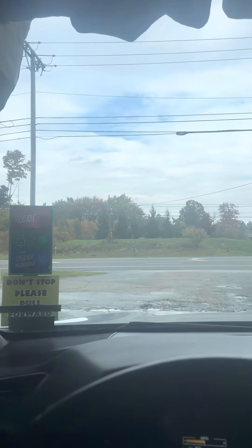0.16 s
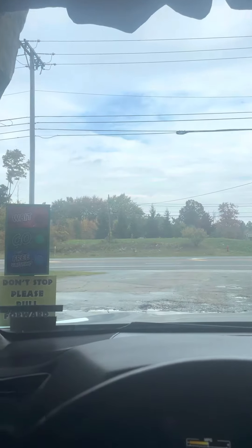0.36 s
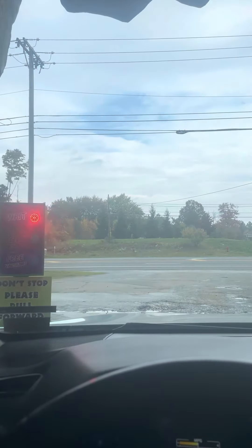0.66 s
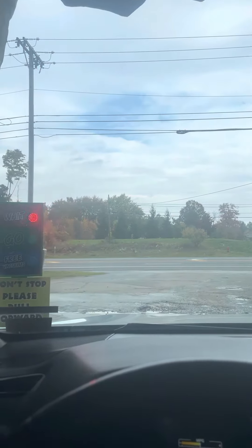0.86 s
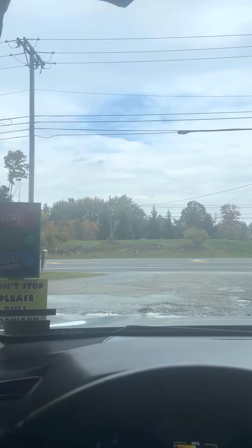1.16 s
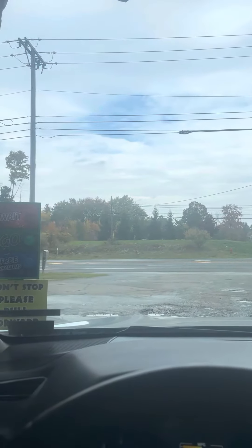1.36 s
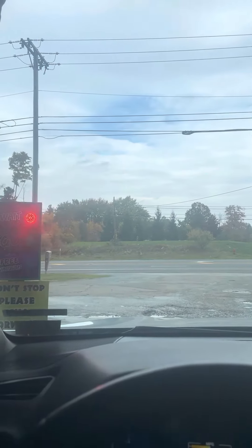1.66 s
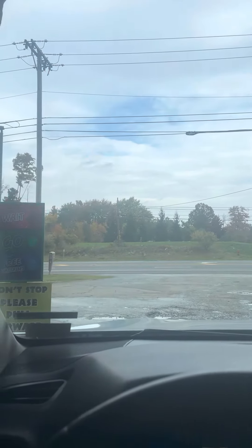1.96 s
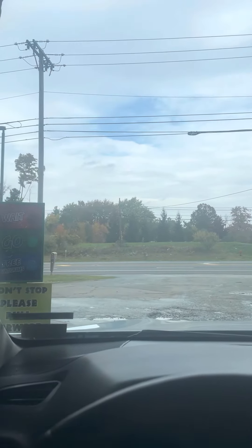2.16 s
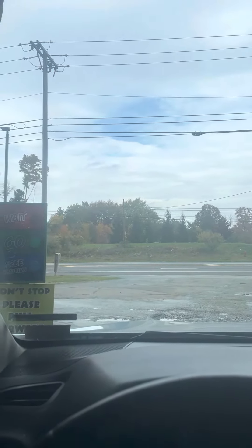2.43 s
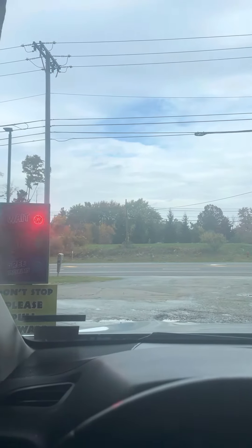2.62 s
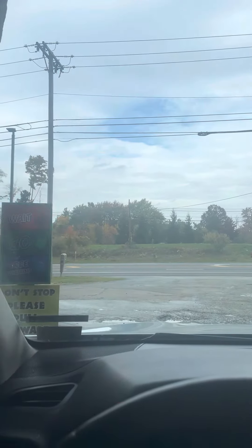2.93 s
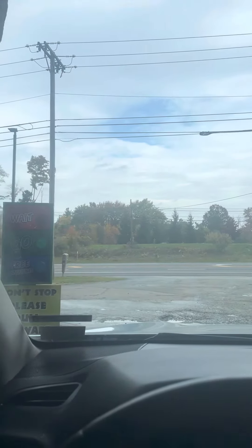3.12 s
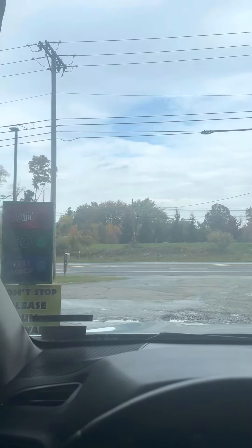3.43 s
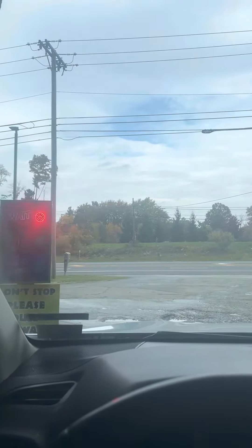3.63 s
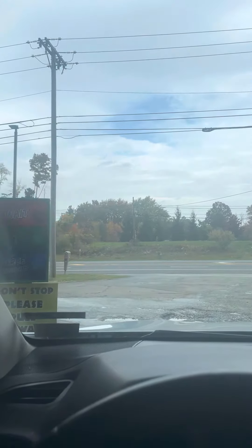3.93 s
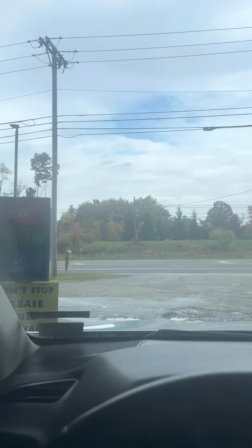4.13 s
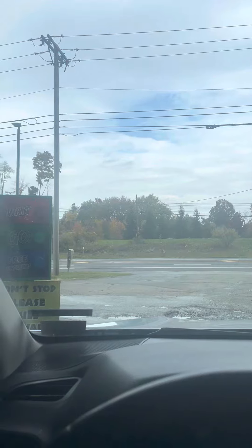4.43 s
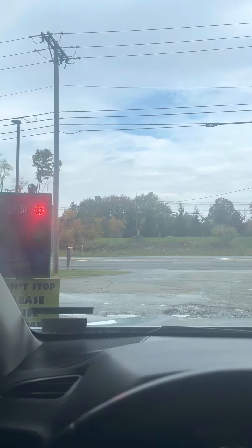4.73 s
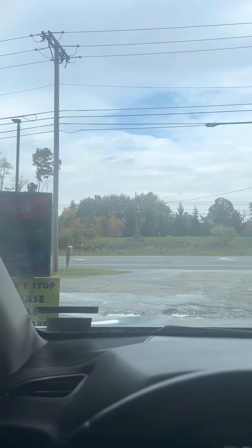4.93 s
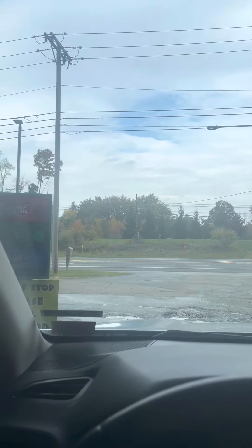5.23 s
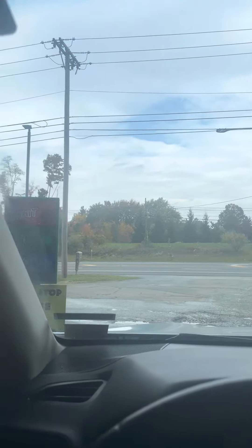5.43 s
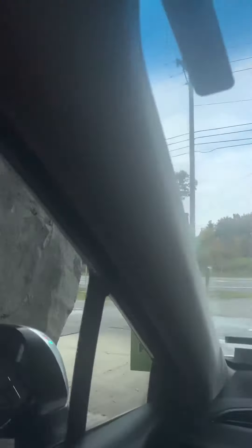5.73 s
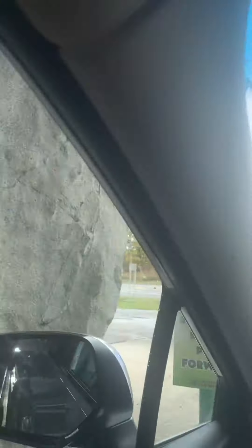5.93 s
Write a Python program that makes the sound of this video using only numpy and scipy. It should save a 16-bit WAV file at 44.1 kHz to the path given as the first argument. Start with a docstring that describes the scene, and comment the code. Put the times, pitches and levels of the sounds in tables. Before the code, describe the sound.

Large blowers dry a car at the end of a wash tunnel, heard inside with the windows shut. A deep panel boom and a low fan hum dominate, with a muffled duct roar above and a thin, much quieter hiss through glass and seals. It is already running at the start and continues evenly, with only slight surges, to the end. A hand-held stereo microphone picks it up close within the small cabin.

```python
"""Large blowers dry a car at the end of a wash tunnel, heard inside it with the windows closed: a steady rush of air.
The unbalanced fan shafts hum as one slowly swelling sine; the jets shake the panels into a low boom of noise.
Duct roar and a thin hiss through glass and seals are noise coloured by the cabin, with short reflections.
A hand-held two-port microphone hears these; its recorder adds two very faint, narrow flickering
noise bands near 12 kHz."""
import sys
import numpy as np
from scipy import signal
from scipy.fft import rfft, irfft, next_fast_len
from scipy.io import wavfile

SR = 44100
rng = np.random.default_rng(int(sys.argv[2]) if len(sys.argv) > 2 else 0)


def put_to_file(sound):
    """Save the sound as 16-bit audio at rate SR, in the file named by the first command-line argument."""
    columns = np.atleast_2d(sound).T  # one column per channel
    safe = np.clip(columns, -1, 1)
    whole_steps = np.round(safe * 32767)
    wavfile.write(sys.argv[1], SR, whole_steps.astype(np.int16))


N = 267951   # samples


def from_db(db):
    """Decibels to gain."""
    return 10 ** (np.asarray(db) / 20)


def rms_one(x):
    """Scale to unit rms."""
    return x / np.sqrt(np.mean(x ** 2) + 1e-20)


def in_time(rows):
    """Table columns as straight-line curves over time, one value a sample."""
    s, *columns = np.transpose(rows)
    return [np.interp(np.arange(N) / SR, s, column) for column in columns]


def at_hz(points, hz, outside=None):
    """Read the columns of (hz, value, ..) rows on a log-frequency axis."""
    where_hz, *columns = np.transpose(points)
    return [np.interp(np.log(hz), np.log(where_hz), column, left=outside, right=outside)
            for column in columns]


def drift(rate_hz):
    """Slow random wandering of rms 1: noise through two equal one-pole low-passes."""
    stride = 40   # samples between the points of the slow noise
    pole = np.exp(-2 * np.pi * rate_hz * stride / SR)
    noise = rng.standard_normal(N // stride + 2002)
    slow = signal.lfilter([1], [1, -2 * pole, pole * pole], noise)
    slow = rms_one(slow[2000:])   # the filter has settled by here
    return np.interp(np.arange(N) / stride, np.arange(len(slow)), slow)


def turbulence(spectrum, gust_db, patch_db, patch_rate_hz, bright_db=0):
    """Air noise of rms 1, coloured by its path and the cabin resonances, at both microphone ports."""
    # cabin and glass resonances: centre_hz, width_hz, lift_db
    resonances = [(47, 4.3, -0.5), (72, 7, 0), (108, 16, 1.5), (124.5, 4, -0.5), (132, 15, 2.5),
                  (146.5, 10, 1), (174, 6.5, 2), (241, 27, 2), (295, 19, 4), (340, 14, 3), (380, 35, 5.5),
                  (415, 17, -1.5), (433.5, 5, 6.5), (453, 14, 5), (487.3, 35, 4.5), (515, 21, -2.5),
                  (554, 22, 1), (600, 16, 3.5), (640, 15, 3.5), (790, 43, 1), (875, 15, -1), (960, 51, 1),
                  (1070, 79, 3), (1177, 66, 2.5), (1870, 140, 2.5), (2220, 120, 2), (2457, 220, 4.5),
                  (2653, 140, 4), (2890, 160, -2), (3050, 80, 3), (3150, 90, 1), (3370, 140, 3.5),
                  (3400, 90, 0.5), (3770, 150, 3.5)]
    # the two microphone ports: hz, share of sound common to both (0-1), left_lead_rad, left_over_right_db
    port_rows = [(70, .9999, 0, 0), (180, .998, -.03, .5), (270, .97, -.12, 1.4), (450, .92, -.27, 1.7),
                 (750, .55, -.42, 1.8), (1700, .82, -.3, .9), (2450, .68, -.15, .9), (2900, .33, -1.3, -.6),
                 (3600, .46, -1.75, -.7), (4700, .1, .2, -.3), (5600, .7, 1, .2), (6400, .8, 1.59, 0),
                 (8200, .76, 2.9, 0), (8900, .85, 3.14, 0), (9900, .998, 3.14, 0)]
    size = next_fast_len(N)
    hz = np.maximum(np.arange(size // 2 + 1) * SR / size, 1)

    lift_db = 0
    for centre_hz, width_hz, peak_db in resonances:
        lift_db = lift_db + peak_db / (1 + (2 * (hz - centre_hz) / width_hz) ** 2)
    colour = from_db(at_hz(spectrum, hz, outside=-150)[0] + lift_db)

    # the common sound reaches one port ahead of the other, the diffuse rest is separate in each
    both, left, right = rfft(rng.standard_normal((3, N)), size)
    share, lead_rad, tilt_db = at_hz(port_rows, hz)
    side = np.array([[.5], [-.5]])   # left, right
    common = np.sqrt(share) * both * np.exp(1j * side * lead_rad)
    diffuse = np.sqrt(1 - share) * np.array([left, right])
    ports = (common + diffuse) * colour * from_db(side * tilt_db)

    # overlapping half-octave bands swell together with the gusts and each a little on its own
    half_octave = 2 * np.log2(hz)
    gusts = gust_db * drift(1.2)
    lowest, highest = (int(2 * np.log2(spectrum[end][0])) for end in (0, -1))
    out = 0
    for k in range(lowest, highest + 2):
        weight = np.clip(1 - abs(half_octave - k), 0, 1)
        band = irfft(ports * weight, size)[:, :N]
        octaves_up = np.clip(k / 2 - np.log2(2500), 0, 2)   # above 2.5 kHz, no more than two
        patches = patch_db * drift(patch_rate_hz)
        out = out + band * from_db(gusts + patches + bright_db * octaves_up)
    return rms_one(out)


def motor_hum():
    """Each turn of the unbalanced fan wheels gives one push, a little under mains speed, barely wandering."""
    # the shaft hum swells and sags slowly: time_s, level_db (rms)
    shaft_level = [(0, -25.5), (.4, -28.5), (2.1, -31), (3.5, -26), (4.7, -29.5), (5.5, -29), (6.08, -30)]
    shaft_hz = 59.33
    level_db, = in_time(shaft_level)
    phase = 2 * np.pi * np.cumsum(shaft_hz + .08 * drift(1.5)) / SR
    return np.sqrt(2) * from_db(level_db) * np.sin(phase)


def panel_boom():
    """The jets shake the roof and door panels, which turn the push of the air into low noise."""
    # roof and door panels, before the cabin resonances: hz, relative density_db (per Hz)
    panel_spectrum = [(15, -41.5), (22, -30), (30, -29.5), (35, -24.5), (39, -19.5), (44, -7), (52, -2.5),
                      (66, 1), (92, -5), (172, -7), (187, -11), (216, -24), (260, -28.5), (400, -61.5)]
    # the boom surges with the jets: time_s, level_db
    surges = [(0, -22), (.6, -23), (1.1, -22.5), (1.6, -23), (2.1, -23), (2.6, -24.5), (3.1, -24.5),
              (3.7, -22.5), (4.3, -24), (4.9, -24), (5.4, -24), (6.08, -24)]
    level_db, = in_time(surges)
    return from_db(level_db) * turbulence(panel_spectrum, gust_db=0.0, patch_db=1.2, patch_rate_hz=2.7)


def duct_roar():
    """Rushing air in the ducts makes a noise that passes the shell and is coloured by the cabin modes."""
    # ducts heard through the shell, before the cabin resonances: hz, relative density_db (per Hz)
    duct_spectrum = [(110, -32), (190, -8.5), (221, -14), (284, -10.5), (313, -12.5), (350, -6), (442, -10),
                     (532, -13.5), (600, -16), (677, -19.5), (764, -18), (883, -23), (1300, -31),
                     (1690, -57.5), (2860, -120)]
    # the roar: time_s, level_db
    roar_level = [(0, -35), (1, -34), (2.4, -34), (3.1, -35), (3.9, -35.5), (4.7, -35), (6.08, -34)]
    level_db, = in_time(roar_level)
    return from_db(level_db) * turbulence(duct_spectrum, gust_db=-0.38, patch_db=0.83, patch_rate_hz=3.3)


def jet_hiss():
    """Jet noise comes thin through glass and door seals, and brightens for moments."""
    # jet noise through glass and seals, before the cabin resonances: hz, relative density_db (per Hz)
    seal_spectrum = [(900, -24.5), (1250, -2.5), (1600, -1.5), (2050, -5.5), (2800, -4), (3950, -8.5),
                     (4200, -10), (5000, -14.5), (7000, -24), (8500, -30), (10000, -39), (11500, -45),
                     (13000, -53), (15500, -59)]
    # the hiss: time_s, level_db
    hiss_level = [(0, -49.5), (.8, -49.5), (1.6, -50), (2.3, -50), (3, -49.5), (3.7, -49.5), (4.4, -50),
                  (5.2, -49.5), (5.55, -49.5), (5.8, -51), (6.08, -50.5)]
    # brighter moments: centre_s, half_length_s, tilt_db_per_octave (2.5 to 10 kHz, even above)
    brighter_moments = [(.85, .06, 1.5), (1.9, .25, 1.1), (2.225, 0.027, 3.5), (5.3, .2, 2),
                        (5.62, .08, 2.2)]
    s = np.arange(N) / SR
    bright_db = 0
    for centre_s, half_s, tilt_db in brighter_moments:
        bright_db = bright_db + tilt_db * np.exp(-((s - centre_s) / half_s) ** 2)
    level_db, = in_time(hiss_level)
    return from_db(level_db) * turbulence(seal_spectrum, gust_db=0.36, patch_db=1.05, patch_rate_hz=11,
                                          bright_db=bright_db)


def cabin_echoes(x):
    """Glass and dash send the sound back; the hand-held microphone sways, so the coloured ridges wander."""
    # reflections from glass and dash: delay_s, level_db (against the direct sound)
    reflections = [(.0043, -15.5), (.0071, -16.5), (0.0118, -17)]
    sway_s = 0.00027   # rms wander of each delay
    n = np.arange(N)
    out = x.copy()
    for delay_s, level_db in reflections:
        late = n - SR * (delay_s + sway_s * drift(0.51))
        out += from_db(level_db) * np.array([np.interp(late, n, port) for port in x])
    return out * np.sqrt(np.mean(x ** 2) / np.mean(out ** 2))   # same rms as before


def treble_bands():
    """Two very faint, narrow flickering noise bands near 12 kHz, added by the recorder alike in both channels."""
    # the faint bands: centre_hz, level_db (before the flicker)
    faint_bands = [(11875, -96.5), (12125, -96.5)]
    width_hz, flicker_db = 120, 2.5
    out = 0
    for hz, level_db in faint_bands:
        edges_hz = [hz - width_hz / 2, hz + width_hz / 2]
        band_pass = signal.butter(3, edges_hz, "band", fs=SR, output="sos")
        band = rms_one(signal.sosfilt(band_pass, rng.standard_normal(N)))
        out = out + band * from_db(level_db + flicker_db * drift(15))
    return out


def scene():
    """Hum, boom, roar and hiss in the cabin, plus the faint bands; only roar and hiss get the reflections."""
    air = cabin_echoes(duct_roar() + jet_hiss())
    return motor_hum() + panel_boom() + air + treble_bands()


def record(dry):
    """A steep low-pass cuts the top, 70 dB down from 15.8 kHz."""
    low_pass = signal.cheby2(12, 70, 15800, fs=SR, output="sos")
    return signal.sosfilt(low_pass, dry)


dry = scene()
out = record(dry)
put_to_file(out)
```